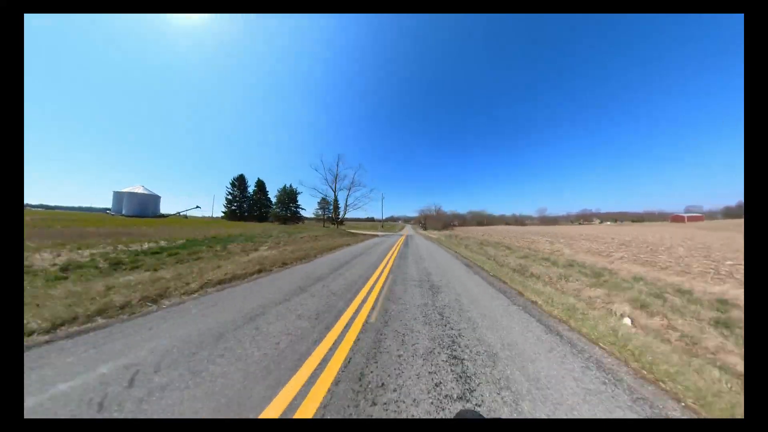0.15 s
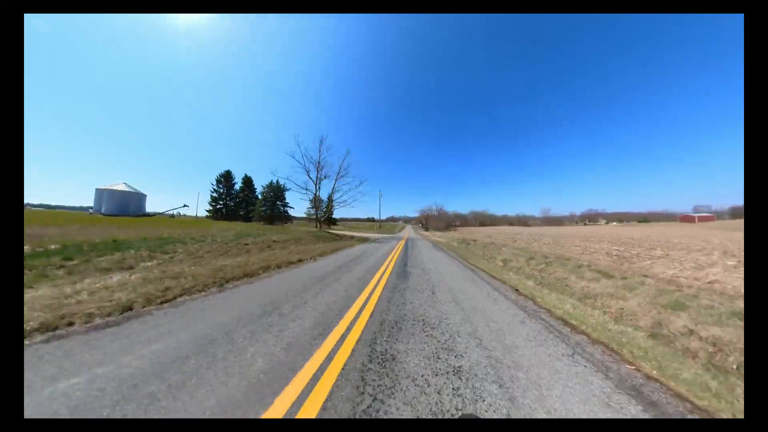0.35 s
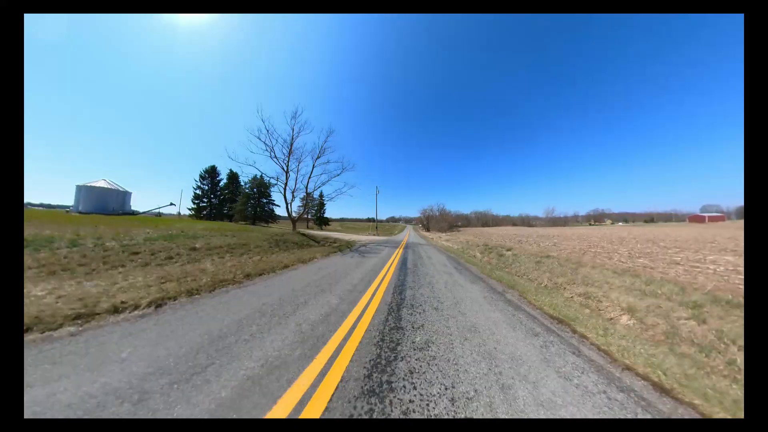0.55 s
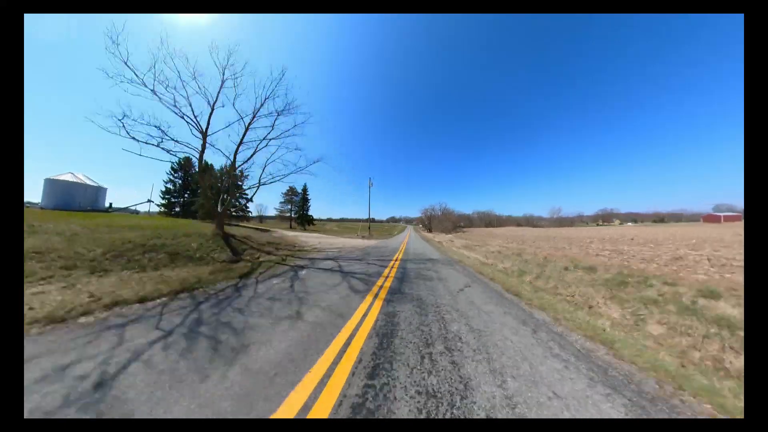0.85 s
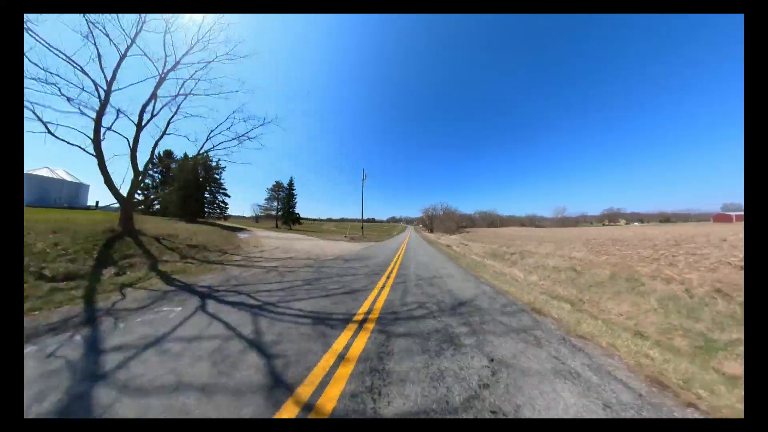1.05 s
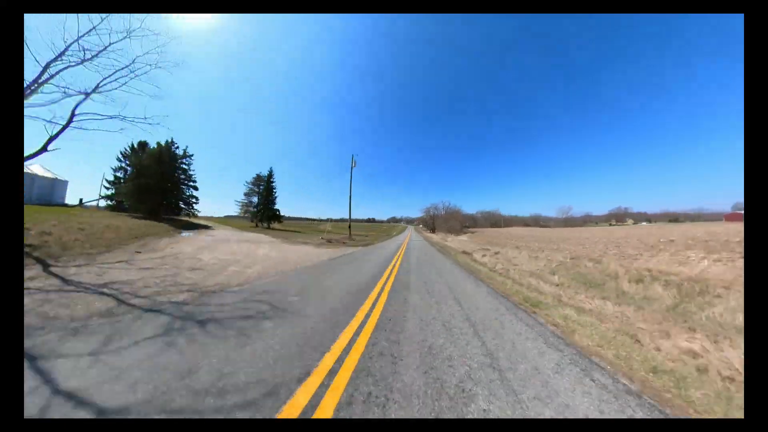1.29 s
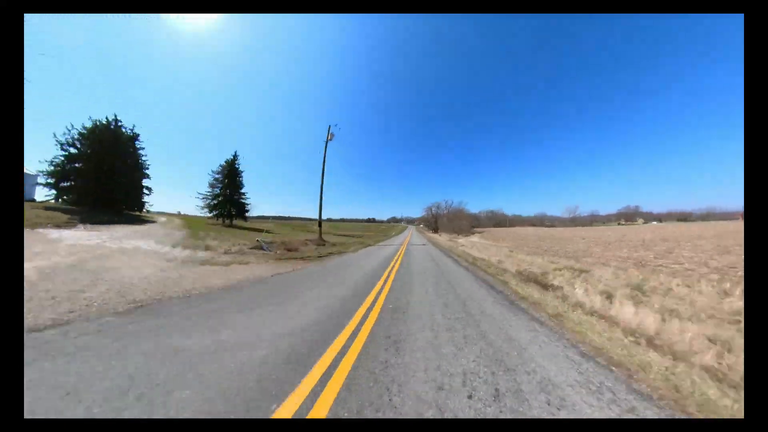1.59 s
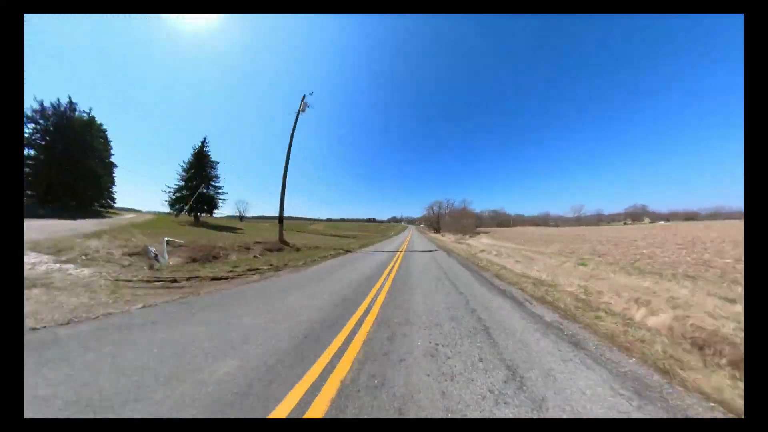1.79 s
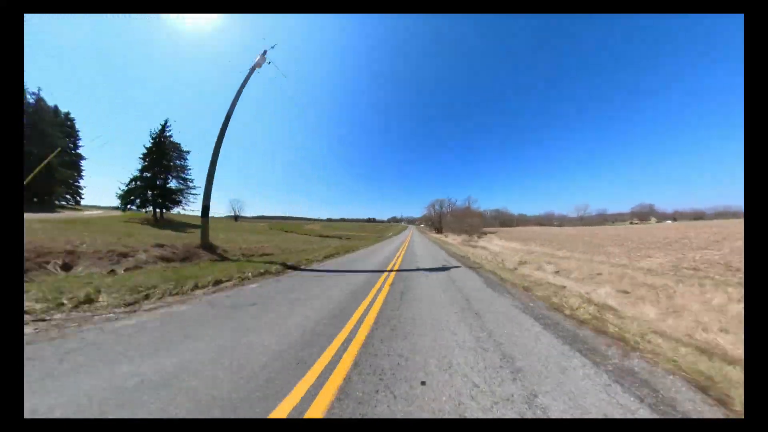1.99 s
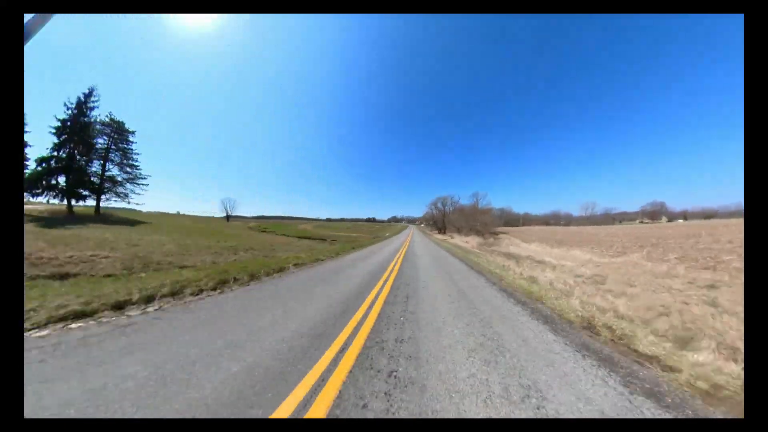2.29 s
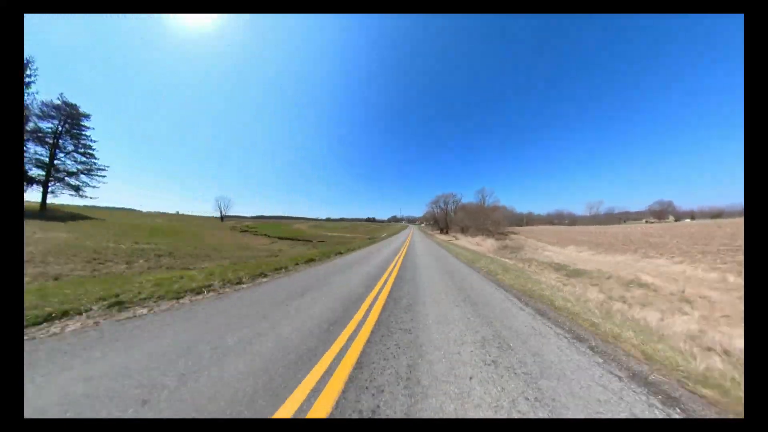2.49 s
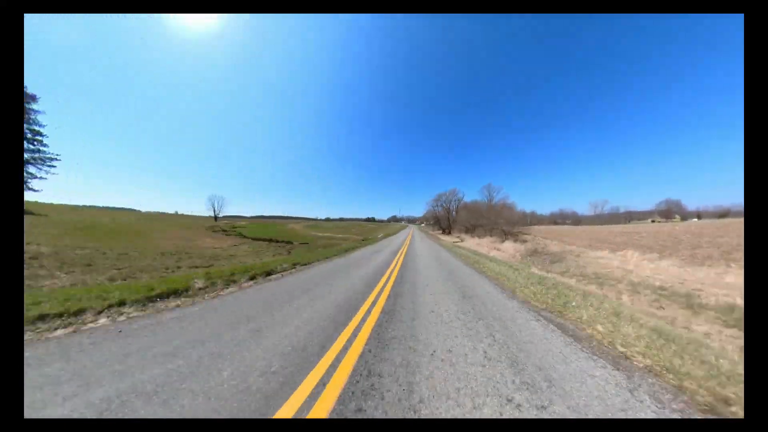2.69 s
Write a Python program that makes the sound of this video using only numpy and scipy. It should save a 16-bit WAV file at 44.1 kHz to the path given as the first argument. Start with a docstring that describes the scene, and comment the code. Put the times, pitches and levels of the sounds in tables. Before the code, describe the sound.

Single-cylinder motorcycle engine thuds steadily at cruising speed, wind buffeting a muffled onboard microphone

```python
"""Single-cylinder motorcycle on a country road

A microphone in a hollow plastic housing on the bike hears exhaust thuds, about 28 a second, as summed orders.
Wind buffets, flutters and roars, and air and road noise rush and hiss, all as shaped noise with level curves.
Mount knocks are short clicks plus ringing housing modes; fainter random chatter and one dry snap join them."""
import sys
import numpy as np
from scipy import signal
from scipy.fft import rfft, irfft
from scipy.io import wavfile
from scipy.ndimage import uniform_filter1d

SR = 44100
rng = np.random.default_rng(int(sys.argv[2]) if len(sys.argv) > 2 else 0)


def put_to_file(sound):
    """Save the sound as 16-bit audio at rate SR, in the file named by the first command-line argument."""
    columns = np.atleast_2d(sound).T  # one column per channel
    safe = np.clip(columns, -1, 1)
    whole_steps = np.round(safe * 32767)
    wavfile.write(sys.argv[1], SR, whole_steps.astype(np.int16))


N = 125685
T = np.arange(N) / SR


def amp(db):
    """Decibels to gain."""
    return 10 ** (np.asarray(db) / 20)


def unit(x):
    """Scales to rms 1."""
    return x / np.sqrt(np.mean(x ** 2) + 1e-20)


def curve(points):
    """Control curve interpolated at every sample."""
    return np.interp(T, *np.transpose(points))


def slow(rate_hz):
    """Random drift of rms 1, mostly below the given rate."""
    hz = np.fft.rfftfreq(N, 1 / SR)
    lowpass = 1 / (1 + (hz / rate_hz) ** 4)
    return unit(irfft(rfft(rng.standard_normal(N)) * lowpass, N))


def noise(spectrum):
    """Gaussian noise of rms 1, shaped by a spectrum interpolated over log frequency."""
    hz = np.fft.rfftfreq(N, 1 / SR)
    points_hz, points_db = np.transpose(spectrum)
    gain = amp(np.interp(np.log(hz + 1), np.log(points_hz), points_db))
    return unit(irfft(rfft(rng.standard_normal(N)) * gain, N))


def steadied(x, size):
    """Divides out the short-term rms (window in samples), so that the level curve sets the swells."""
    power = uniform_filter1d(uniform_filter1d(x ** 2, size), size)
    return x / np.sqrt(power + 1e-12)


def patchy(x, depth_db):
    """Lets patches of the spectrum swell and fade on their own."""
    z = signal.stft(x, nperseg=1024, noverlap=768)[2]
    patches = uniform_filter1d(rng.standard_normal(z.shape), size=6, axis=0)
    patches = unit(uniform_filter1d(patches, size=10, axis=1))
    varied = signal.istft(z * amp(depth_db * patches), nperseg=1024, noverlap=768)[1]
    return unit(varied[:N])


# Firing rate before waver: (time [s], rate [firings/s])
FIRING_RATE = [(0, 28.16), (.45, 28.27), (.75, 27.95), (1.1, 27.82), (1.45, 27.73), (1.75, 27.48),
               (2.85, 27.47)]
# Engine load gain: (time [s], level [dB])
ENGINE_LOAD = [(0, -8.5), (.35, -0.5), (.7, 1.5), (1.05, 1.5), (1.3, 1), (1.7, 2), (1.86, -10), (2.1, -8.5),
               (2.4, -17.5), (2.85, 0.5)]
# Exhaust orders before load: (multiple of firing rate [1], level [dB rms])
EXHAUST_ORDERS = [(2, -55.5), (3, -42.5), (4, -44), (5, -41.5), (6, -49.5), (7, -50.5), (8, -44),
                  (9, -50.5), (10, -47.5), (11, -54), (12, -57.5), (13, -47.5), (14, -58.5), (15, -67),
                  (16, -62), (18, -63.5), (19, -66), (20, -59.5), (21, -59), (22, -55.5), (24, -61),
                  (25, -63.5), (26, -52.5), (28, -73), (32, -56), (34, -70), (37, -54.5), (42, -72.5)]
WAVER_SHARE, WAVER_HZ = 0.0039, 6.4
UNEVEN_DB, UNEVEN_HZ = -2, 29


def engine():
    """Exhaust pulses repeat at the firing rate: a stack of orders on a wavering speed, uneven in level."""
    turns = np.cumsum(curve(FIRING_RATE) * (1 + WAVER_SHARE * slow(WAVER_HZ))) / SR
    orders = np.arange(2, 43)
    peaks = np.sqrt(2) * amp(np.interp(orders, *np.transpose(EXHAUST_ORDERS)))
    tone = np.zeros(N)
    for order, peak in zip(orders, peaks):
        tone += peak * np.cos(2 * np.pi * (order * turns + rng.random()))
    return tone * amp(curve(ENGINE_LOAD) + UNEVEN_DB * slow(UNEVEN_HZ))


# Gusts before trim: (time [s], level [dB])
GUST_LEVEL = [(0.0, -30.5), (0.05, -21), (0.08, -37), (0.14, -29.5), (0.23, -41), (0.27, -29.5),
              (0.33, -43.5), (0.36, -35), (0.44, -36), (0.46, -26.5), (0.52, -29), (0.54, -43.5),
              (0.59, -26.5), (0.64, -33), (0.74, -29), (0.76, -34.5), (0.86, -39.5), (0.88, -26.5),
              (0.93, -43.5), (1.05, -33), (1.07, -40), (1.1, -43), (1.13, -44), (1.17, -23), (1.21, -40),
              (1.23, -32), (1.28, -31.5), (1.3, -34.5), (1.38, -38), (1.43, -27), (1.48, -44),
              (1.52, -33.5), (1.56, -39), (1.61, -28), (1.7, -46.5), (1.71, -31.5), (1.77, -21),
              (1.79, -41), (1.82, -29.5), (1.86, -38), (1.89, -28), (1.96, -26), (1.98, -31.5), (2.1, -27),
              (2.13, -37.5), (2.17, -37), (2.19, -41), (2.26, -24.5), (2.33, -34.5), (2.4, -26),
              (2.43, -42), (2.44, -24.5), (2.56, -32), (2.59, -22), (2.65, -42), (2.71, -29), (2.73, -42),
              (2.79, -38), (2.83, -30.5), (2.85, -36)]
# Relative buffet spectrum: (frequency [Hz], density [dB per Hz])
BUFFET_SPECTRUM = [(10, -21), (24, -14), (32, -9), (41, -8.5), (54, -0.5), (80, -2), (100, -8.5),
                   (140, -24.5), (600, -70.5), (4000, -130)]
BUFFET_TRIM_DB = -1


def buffet():
    """Gusts thump on the microphone as bass noise."""
    return steadied(noise(BUFFET_SPECTRUM), size=1000) * amp(BUFFET_TRIM_DB + curve(GUST_LEVEL))


# Upper bass of the wind before trim: (time [s], level [dB])
FLUTTER_CURVE = [(0.0, -22), (0.03, -26.5), (0.06, -47), (0.09, -28.5), (0.24, -42.5), (0.27, -32),
                 (0.31, -44), (0.4, -28), (0.41, -31.5), (0.48, -28), (0.5, -35), (0.53, -29), (0.55, -38),
                 (0.59, -32), (0.62, -29.5), (0.66, -24), (0.68, -38.5), (0.72, -30.5), (0.75, -35.5),
                 (0.78, -30), (0.97, -37), (1.03, -31), (1.05, -34), (1.15, -29), (1.19, -37.5),
                 (1.21, -32), (1.41, -29.5), (1.44, -37.5), (1.48, -29), (1.52, -39.5), (1.56, -30),
                 (1.6, -41), (1.63, -30.5), (1.76, -27.5), (1.82, -38), (1.88, -29.5), (1.9, -36.5),
                 (1.93, -27), (1.96, -33), (1.98, -23.5), (2.02, -36.5), (2.05, -30), (2.12, -31),
                 (2.24, -27), (2.26, -36), (2.3, -30.5), (2.33, -40), (2.39, -23.5), (2.41, -34.5),
                 (2.48, -26), (2.52, -36.5), (2.61, -34), (2.63, -37.5), (2.67, -27), (2.73, -49),
                 (2.75, -31), (2.82, -49.5), (2.85, -36)]
# Relative flutter spectrum: (frequency [Hz], density [dB per Hz])
FLUTTER_SPECTRUM = [(20, -43.5), (70, -13.5), (95, 0), (115, 2), (160, -2.5), (200, -8.5), (300, -22.5),
                    (600, -47.5), (2000, -90.5)]
FLUTTER_TRIM_DB = -0.5


def flutter():
    """Upper-bass wind noise with its own swells."""
    return steadied(noise(FLUTTER_SPECTRUM), size=1000) * amp(FLUTTER_TRIM_DB + curve(FLUTTER_CURVE))


# Low roar before trim: (time [s], level [dB])
ROAR_CURVE = [(0.0, -37.5), (0.11, -35), (0.15, -39), (0.21, -40), (0.23, -41.5), (0.27, -30.5),
              (0.32, -44), (0.37, -26.5), (0.41, -42), (0.48, -29), (0.52, -39.5), (0.61, -29.5),
              (0.67, -41.5), (0.74, -31), (0.79, -43), (0.82, -35.5), (0.85, -39), (0.9, -32.5),
              (0.92, -39), (0.98, -33), (1.0, -32), (1.18, -37), (1.4, -34), (1.46, -40), (1.48, -34),
              (1.65, -31.5), (1.67, -42), (1.7, -31), (1.79, -41), (1.85, -35), (1.89, -41), (1.93, -34.5),
              (1.96, -37.5), (2.02, -36), (2.07, -32), (2.13, -41), (2.17, -37), (2.21, -38.5),
              (2.24, -26.5), (2.27, -38), (2.39, -32), (2.41, -42), (2.44, -33), (2.47, -39), (2.5, -32),
              (2.66, -37), (2.68, -32), (2.73, -35), (2.76, -32), (2.85, -36)]
# Relative roar spectrum: (frequency [Hz], density [dB per Hz])
ROAR_SPECTRUM = [(30, -45), (120, -23.5), (185, 2.5), (250, 1.5), (310, -3), (370, -2.5), (450, -12),
                 (600, -22.5), (1200, -48), (4000, -91.5)]
ROAR_TRIM_DB = -1


def roar():
    """Low wind roar, as noise above the flutter."""
    return steadied(noise(ROAR_SPECTRUM), size=1200) * amp(ROAR_TRIM_DB + curve(ROAR_CURVE))


# Lower middle of the rush before trim and flicker: (time [s], level [dB])
MIDDLE_CURVE = [(0.0, -41.5), (0.02, -38.5), (0.07, -51), (0.09, -42.5), (0.44, -37.5), (0.55, -46),
                (0.59, -37), (0.77, -42.5), (0.83, -34), (0.87, -42), (0.97, -39), (0.98, -36), (1.19, -42),
                (1.21, -37.5), (1.25, -43.5), (1.6, -38), (1.75, -45), (1.81, -47), (1.84, -41.5),
                (2.14, -40.5), (2.17, -37), (2.19, -42), (2.26, -38), (2.3, -45), (2.37, -38), (2.4, -51),
                (2.43, -37.5), (2.51, -44), (2.56, -37), (2.62, -43), (2.83, -37), (2.85, -37)]
# Relative lower-middle spectrum: (frequency [Hz], density [dB per Hz])
MIDDLE_SPECTRUM = [(100, -41), (330, -11), (430, 1.5), (520, -1.5), (630, 2), (730, -1), (800, -8),
                   (1200, -32.5), (4000, -88.5)]
# Air and road noise before trim and flicker: (time [s], level [dB])
RUSH_CURVE = [(0, -41), (.1, -40.5), (.2, -36.5), (.3, -36), (.36, -31.5), (.42, -34.5), (.52, -37.5),
              (.65, -37), (.8, -36), (.88, -34), (.93, -35.5), (.98, -32), (1.04, -36), (1.12, -33.5),
              (1.18, -38.5), (1.35, -37.5), (1.46, -36), (1.64, -36), (1.8, -39), (1.84, -41.5),
              (1.88, -38), (2.17, -36.5), (2.3, -40.5), (2.36, -34), (2.4, -42.5), (2.45, -39), (2.6, -37),
              (2.75, -36), (2.85, -33)]
# Relative rush spectrum, coloured by the housing: (frequency [Hz], density [dB per Hz])
RUSH_SPECTRUM = [(100, -32), (600, -11), (790, -3.5), (865, 2.5), (950, 1), (1030, 2), (1120, -1.5),
                 (1220, -9.5), (1450, -10.5), (1800, -13.5), (2150, -24), (2700, -53), (5000, -74)]
MIDDLE_TRIM_DB, RUSH_TRIM_DB = -1.5, -5
RUSH_PATCH_DB, RUSH_FLICKER_DB = 1.5, 1


def rush(flicker):
    """Air and road noise through the hollow housing: a lower middle and a patchy body, flickering in level."""
    middle = steadied(noise(MIDDLE_SPECTRUM), size=1200) * amp(MIDDLE_TRIM_DB + curve(MIDDLE_CURVE))
    body = steadied(patchy(noise(RUSH_SPECTRUM), RUSH_PATCH_DB), size=1500)
    body = body * amp(RUSH_TRIM_DB + curve(RUSH_CURVE))
    return (middle + body) * amp(RUSH_FLICKER_DB * flicker)


# Hiss before trim and flicker: (time [s], level [dB])
HISS_CURVE = [(0, -64), (.06, -72), (.16, -67), (.3, -63.5), (.43, -59.5), (.5, -65.5), (.57, -62.5),
              (.72, -64), (.83, -62.5), (.95, -64), (1.08, -60), (1.17, -68.5), (1.25, -65), (1.32, -66),
              (1.45, -63.5), (1.57, -65), (1.65, -67), (1.73, -66.5), (1.79, -68.5), (1.9, -64),
              (2.12, -68), (2.18, -64), (2.23, -69.5), (2.41, -68.5), (2.49, -67), (2.58, -67), (2.85, -63)]
# Relative hiss spectrum: (frequency [Hz], density [dB per Hz])
HISS_SPECTRUM = [(100, -31), (1500, -5.5), (2200, -8), (2470, 2), (2850, -2), (3150, -8), (3500, -7),
                 (3900, -6.5), (4500, -21.5), (9000, -60)]
# Faint top of the hiss before trim and flicker: (time [s], level [dB])
FIZZ_CURVE = [(0, -63), (.06, -73.5), (.13, -65.5), (.37, -61), (.48, -64.5), (1.05, -64), (1.18, -66.5),
              (1.29, -69.5), (1.36, -66), (1.5, -65.5), (1.65, -68.5), (1.82, -67.5), (1.92, -64),
              (2.05, -68.5), (2.18, -66), (2.3, -69), (2.42, -69), (2.48, -63), (2.57, -66.5), (2.85, -61)]
# Relative fizz spectrum: (frequency [Hz], density [dB per Hz])
FIZZ_SPECTRUM = [(2000, -29), (4500, -8), (5300, -1.5), (6100, -5), (7200, 0.5), (8200, -6.5),
                 (9200, -21.5), (20000, -29.5)]
HISS_TRIM_DB, FIZZ_TRIM_DB, HISS_FLICKER_DB = 3, -0.5, 0.5


def hiss(flicker):
    """Thin treble noise on top of the rush, in two bands that share its flicker."""
    lower = noise(HISS_SPECTRUM) * amp(HISS_TRIM_DB + curve(HISS_CURVE))
    fizz = noise(FIZZ_SPECTRUM) * amp(FIZZ_TRIM_DB + curve(FIZZ_CURVE))
    return (lower + fizz) * amp(HISS_FLICKER_DB * flicker)


# Housing modes: (frequency [Hz], relative level [dB], t60 [s])
HOUSING_MODES = [(1048.3, -1.5, 0.043), (890, -16.5, 0.007), (1200, -6.5, 0.0049)]


def housing(t):
    """Ring of the plastic housing after one knock: decaying sine modes."""
    return sum(amp(db - 60 * t / t60) * np.sin(2 * np.pi * hz * t) for hz, db, t60 in HOUSING_MODES)


CHATTER_PER_S, CHATTER_SPREAD_DB = 45, 3
CHATTER_DB = -11.5  # relative to RUSH_CURVE


def chatter():
    """Road vibration nudges the housing with faint, uneven knocks at random times."""
    strength = amp(CHATTER_SPREAD_DB * np.minimum(rng.exponential(1, N), 2))
    knocks = (rng.random(N) < CHATTER_PER_S / SR) * strength
    ringing = signal.oaconvolve(knocks, housing(T[:4096]))[:N]
    return unit(ringing) * amp(CHATTER_DB + curve(RUSH_CURVE))


# Mount ticks: (time [s], level [dB], click pitch [Hz], click t60 [s], housing ring re level [dB])
MOUNT_TICKS = [(0.1748, -33, 1360, 0.011, 1), (0.2719, -30, 1430, 0.0069, 8), (.449, -40, 1250, .004, 14.5),
               (0.4602, -35, 1440, 0.0055, -5), (0.6112, -31, 1460, 0.0081, -13.5),
               (.7194, -31.5, 1480, 0.0066, 8), (0.808, -30.5, 1460, 0.0072, 0.5),
               (.879, -45, 1250, 0.0032, 11.5), (0.8985, -39.5, 1510, 0.0035, 4),
               (.9860, -27.5, 1440, 0.006, 2), (1.035, -40, 1420, .006, 11),
               (1.0673, -29.5, 1535, 0.0069, 1), (1.1392, -31, 1370, 0.0043, 2),
               (1.2104, -33.5, 1370, 0.0076, 4), (1.3721, -26.5, 1530, 0.0049, -7.5),
               (1.4414, -36.5, 1460, 0.004, 5), (1.4713, -26, 1480, 0.005, -2.5),
               (1.5564, -38, 1510, 0.0044, 3), (1.6529, -29.5, 1423, 0.023, -2.5),
               (1.7533, -39, 1390, 0.0094, -3), (1.831, -34, 1420, 0.0051, -10),
               (1.8782, -32, 1460, 0.0076, 7), (1.8853, -36, 1200, 0.0088, 7.5),
               (1.9087, -30.5, 1610, 0.0052, -7), (1.9773, -36, 1370, 0.008, 10),
               (2.0158, -35.5, 1520, 0.0071, -9), (2.064, -29.5, 1450, .009, 2),
               (2.1105, -36, 1480, 0.012, -8.5), (2.1838, -35.5, 1290, 0.0054, 1),
               (2.2285, -34.5, 1490, 0.0081, -11.5), (2.6058, -40.5, 1410, 0.0069, -0.5),
               (2.7125, -31.5, 1450, 0.0057, 5), (2.8444, -30.5, 1410, 0.0078, -1)]
CLICK_DB = 8.5  # relative to the tick level
CLICK_RISE_SHARE = .02  # rise time constant / t60


def rattle():
    """Each mount knock is a short, soft-edged click that leaves the plastic housing ringing."""
    t = np.arange(4096) / SR
    out = np.zeros(N)
    for start_s, level_db, click_hz, click_t60_s, ring_db in MOUNT_TICKS:
        rise = 1 - np.exp(-t / (CLICK_RISE_SHARE * click_t60_s))
        click = rise * amp(-60 * t / click_t60_s) * np.sin(2 * np.pi * click_hz * t)
        knock = amp(level_db) * (amp(CLICK_DB) * click + amp(ring_db) * housing(t))
        part = out[round(start_s * SR):][:len(t)]
        part += knock[:len(part)]
    return out


SNAP_S, SNAP_DB, SNAP_HZ = 1.8968, -37.5, 4450
SNAP_SIGMA_S = .00022


def snap():
    """One tiny, dry click, brighter than the knocks: a cosine under a Gaussian envelope."""
    t = T - SNAP_S
    envelope = np.exp(-(t / SNAP_SIGMA_S) ** 2 / 2)
    return amp(SNAP_DB) * envelope * np.cos(2 * np.pi * SNAP_HZ * t)


KNOCK_LOWPASS_HZ = 1800


def scene():
    """Engine, wind, rush, hiss, dulled knocks and snap at one microphone."""
    wind = buffet() + flutter() + roar()
    flicker = slow(59)
    air = rush(flicker) + hiss(flicker)
    lowpass = signal.firwin(301, KNOCK_LOWPASS_HZ, fs=SR)
    knocks = signal.oaconvolve(chatter() + rattle(), lowpass, "same")
    return (engine() + wind + air + knocks + snap())[None]


LOW_CUT_HZ, MUFFLE_HZ = 40, 3289
LEAK_DB = -19  # treble that gets past the muffling


def record(dry):
    """A low cut tames the wind; the muffled microphone weakens the treble above its cut-off."""
    hz = np.fft.rfftfreq(N, 1 / SR)
    low_cut = 1 / np.sqrt(1 + (LOW_CUT_HZ / (hz + 1)) ** 6)
    cut = irfft(rfft(dry) * low_cut, N)
    lowpass = signal.firwin(151, MUFFLE_HZ, window=("kaiser", 7), fs=SR)
    low = signal.oaconvolve(cut, lowpass[None], "same")
    return low + amp(LEAK_DB) * (cut - low)


dry = scene()
out = record(dry)
put_to_file(out)
```